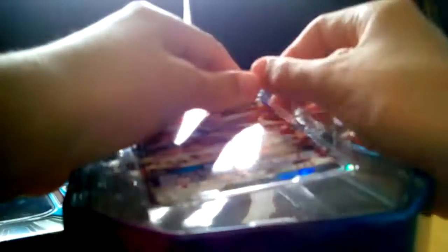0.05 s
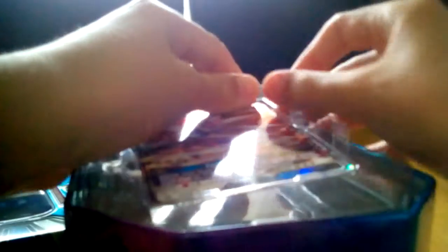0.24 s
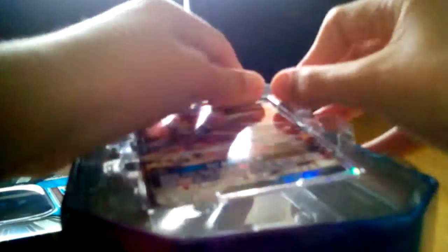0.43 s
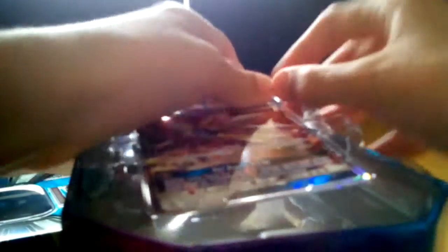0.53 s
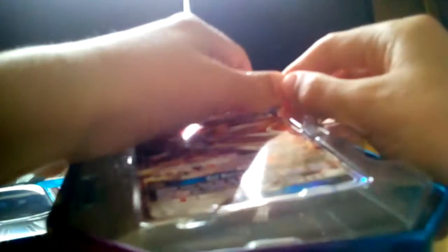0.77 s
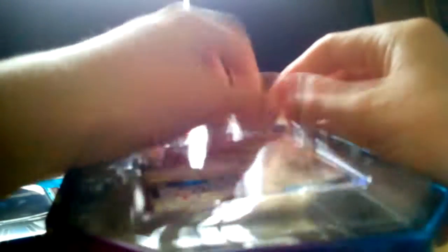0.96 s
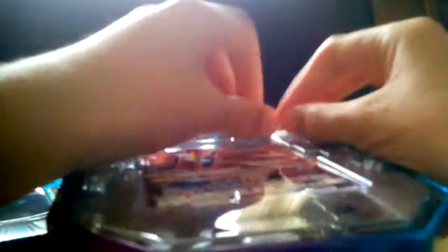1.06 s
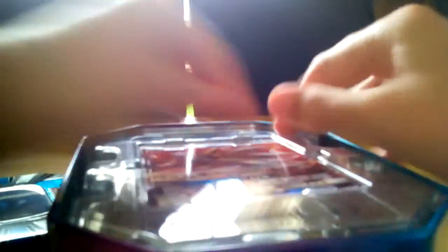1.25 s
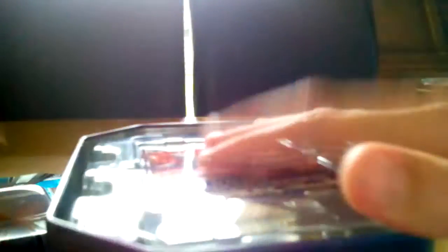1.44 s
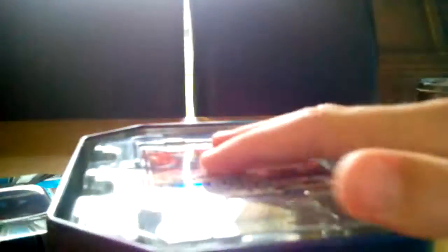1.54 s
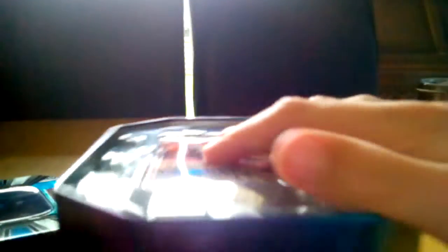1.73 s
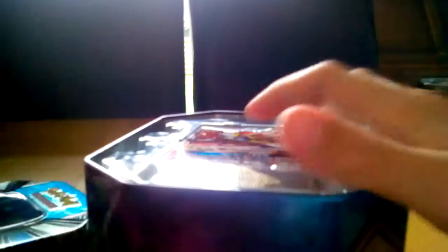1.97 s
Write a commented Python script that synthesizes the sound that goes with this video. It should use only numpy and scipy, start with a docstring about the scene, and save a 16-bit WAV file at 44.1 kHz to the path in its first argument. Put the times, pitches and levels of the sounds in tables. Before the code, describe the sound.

Three sharp, hollow snaps come from a tin's plastic cover, amid faint finger rubbing and tiny ticks. Light knocks on a table and a brief rattle of the metal lid follow, heard up close in a quiet room.

```python
"""In a small quiet room, close to the microphone, fingers pick at the clear plastic cover of a tin.
Skin catches and slips on the plastic, rubbing and hissing, and tiny creases tick under the nails.
Three times the stiff plastic flips with a sharp snap and a hollow pop. The tin bumps the table,
then a hand presses the lid, which buckles with a short metallic rattle."""
import sys
import numpy as np
from scipy import signal
from scipy.fft import rfft, irfft
from scipy.io import wavfile
from scipy.ndimage import uniform_filter1d

SR = 44100
rng = np.random.default_rng(int(sys.argv[2]) if len(sys.argv) > 2 else 0)


def store_wav(level_fs):
    """Save 16-bit WAV to argv[1]."""
    pcm = np.round(np.clip(np.atleast_2d(level_fs), -1, 1) * 32767)
    wavfile.write(sys.argv[1], SR, pcm.T.astype(np.int16))


N = 88200  # 2 seconds


def amp(db):
    """Turns decibels into a gain to multiply by."""
    return 10 ** (np.asarray(db) / 20)

def unit(x):
    """Scales a sound to an average (rms) level of 1."""
    return x / np.sqrt(np.mean(x ** 2) + 1e-20)

def value_at(curve, hz):
    """Looks up a value between a table's rows, on a log pitch scale."""
    pitches, values = np.transpose(curve)
    return np.interp(np.log(hz + 1), np.log(pitches + 1), values)

def add(mix, start_s, sound):
    """Mixes a sound in at a given time."""
    part = mix[max(round(start_s * SR), 0):][:len(sound)]
    part += sound[:len(part)]

def colour(x, curve, size=4096):
    """Makes each pitch louder or softer, following rows of pitch_hz, gain_db."""
    log_gain = np.log(amp(value_at(curve, abs(np.fft.fftfreq(size, 1 / SR)))))
    taps = np.fft.ifft(np.exp(np.conj(signal.hilbert(log_gain)))).real
    return signal.fftconvolve(x, taps[:size // 2])[:len(x)]

def burst(decay_s, size=8192):
    """A dying puff of noise, about equally strong at every pitch."""
    fade = np.exp(-np.arange(size) / SR / decay_s)
    puff = rng.standard_normal(size) * fade
    for _ in range(6):  # even out the pitches, then fade again
        puff = irfft(np.exp(1j * np.angle(rfft(puff)))) * fade ** 0.25
    return puff / np.linalg.norm(puff)

def ring(notes, size=22050):
    """Pure tones dying together; each falls by 60 dB in its ring_s."""
    t, out = np.arange(size) / SR, np.zeros(size)
    for pitch_hz, gain_db, ring_s in notes:
        decay = np.log(1000) / ring_s
        out += amp(gain_db) * 2 * decay / SR * np.exp(-decay * t) * np.cos(2 * np.pi * pitch_hz * t)
    return out

def fade_in(x, rise_s):
    """Brings a sound up from silence."""
    return x * np.minimum(np.arange(len(x)) / SR / rise_s, 1)


# Tone of the quiet room: pitch_hz, gain_db
BACKGROUND_TONE = [(25, -16.5), (100, 5.5), (200, 6.5), (400, -2.5), (1000, -2), (1350, -13.5), (1750, -4),
                   (2150, -15.5), (2700, -11.5), (3100, -21), (3650, -11.5), (4300, -29.5), (5700, -23),
                   (7500, -39), (10000, -45), (16000, -46.5)]
def background(level_db=-52.5):
    """A faint, steady, low noise."""
    return amp(level_db) * unit(colour(rng.standard_normal(N), BACKGROUND_TONE))

# How loud the rubbing is over time: time_s, level_db
RUB_LEVELS = [(0, -50), (.1, -50.5), (.17, -44), (.35, -44.5), (.45, -46.5), (.56, -40.5), (.69, -47),
              (.73, -47), (.84, -52), (.95, -36.5), (1.04, -44.5), (1.31, -46.5), (1.37, -42.5),
              (1.45, -65.5), (1.55, -61.5), (1.59, -37), (1.64, -57.5), (1.8, -44.5), (1.92, -49.5),
              (1.96, -37), (2, -44)]
# Dull tone of the rubbing: pitch_hz, gain_db
RUB_TONE = [(35, -36), (65, -8.5), (100, -1), (200, -4.5), (310, -0.5), (450, -2), (600, -6.5), (850, -6),
            (1250, -7.5), (1700, -20.5), (2700, -19), (4200, -32), (5900, -28.5), (8000, -64.5),
            (14000, -79.5)]
def rubbing(grains_per_s=5000, spread_db=2.5):
    """Fingertips catch and slip very fast; each slip is a tiny grain of sound."""
    grains = rng.standard_normal(N) * amp(spread_db * np.minimum(rng.exponential(1, N), 3))
    grains *= rng.random(N) < grains_per_s / SR
    level_db = np.interp(np.arange(N) / SR, *np.transpose(RUB_LEVELS))
    return unit(colour(grains, RUB_TONE)) * amp(level_db)

# Finger slides: start_s, rise_s, fade_s, level_db
FINGER_SLIDES = [(.04, 0.036, 0.01, -49), (.17, 0.019, 0.088, -49.5), (0.323, 0.018, 0.1, -54),
                 (0.4, 0.01, 0.026, -45), (0.531, 0.048, 0.064, -69.5), (1.932, 0.034, .05, -62)]
# Bright tone of a slide: pitch_hz, gain_db
SLIDE_TONE = [(500, -10.5), (2000, -1), (3500, 4), (6200, 2.5), (8000, -10.5), (11500, -15.5), (13000, -26),
              (16000, -40.5)]
def slides(grains_per_s=8300):
    """Skin slides over the plastic with short, grainy hisses."""
    out, t = np.zeros(N), np.arange(SR // 2) / SR
    for start_s, rise_s, fade_s, level_db in FINGER_SLIDES:
        fade = np.exp(-np.maximum(t - rise_s, 0) / fade_s)
        grains = rng.standard_normal(len(t)) * (rng.random(len(t)) < grains_per_s / SR)
        hiss = unit(colour(grains, SLIDE_TONE))
        add(out, start_s, amp(level_db) * fade_in(hiss, rise_s) * fade)
    return out

# Finger drags: start_s, rise_s, hold_s, fade_s, pitch_hz, width_hz, level_db
FINGER_DRAGS = [(0, 0.0026, .03, .02, 290, 100, -46.5), (1.335, 0.013, 0.017, 0.018, 277, 66, -40.5),
                (0.529, 0.024, .14, .015, 414, 180, -46), (1.758, 0.086, .2, .03, 1167, 320, -47.5)]
def drags():
    """A dragging finger shakes the cover or lid, making noise around one pitch."""
    out, t = np.zeros(N), np.arange(SR // 2) / SR
    for start_s, rise_s, hold_s, fade_s, pitch_hz, width_hz, level_db in FINGER_DRAGS:
        fade = np.exp(-np.maximum(t - rise_s - hold_s, 0) / fade_s)
        band = signal.butter(2, [pitch_hz - width_hz / 2, pitch_hz + width_hz / 2], "band", fs=SR)
        scrape = unit(signal.lfilter(*band, rng.standard_normal(len(t))))
        add(out, start_s, amp(level_db) * fade_in(scrape, rise_s) * fade)
    return out

# Ticks under the fingernails: start_s, gain_db
NAIL_TICKS = [(.139, -5), (.21, -4), (0.635, -2), (0.671, -3.5), (0.761, -7.5), (0.7844, -1.5), (.790, -7),
              (.947, 0.5), (1.033, -1.5), (1.166, -4), (1.212, -3), (1.319, -5), (1.332, -6), (1.365, -4)]
# Tone of a tick: pitch_hz, gain_db
TICK_TONE = [(70, -17), (350, 7.5), (1200, -0.5), (2000, -12), (4000, -19), (6000, -27.5), (7500, -43),
             (15000, -76)]
def ticks():
    """Tiny creases give way in the plastic, each with a puff of noise."""
    out = np.zeros(N)
    for start_s, gain_db in NAIL_TICKS:
        add(out, start_s, amp(gain_db) * burst(decay_s=0.0028))
    return colour(out, TICK_TONE)

# Notes of the plastic on the tin, rung by bumps and snaps: pitch_hz, gain_db, ring_s
COVER_NOTES = [(100, 9, .25), (145, 1, .18), (340, 2, .11), (425, 1, .1), (470, -1, .13), (595, 2, .13),
               (742, 0, .1), (820, -1, .09), (1115, 0, .11), (1345, 0, .08), (2230, -2, .1),
               (3090, -3, .08)]
# The tin meeting the table: start_s, gain_db, contact_s
TABLE_BUMPS = [(1.214, 3.5, 0.0014), (1.22, -2, 0.0021), (1.2346, -1, 0.0034), (1.295, -8.5, 0.00079),
               (1.356, -6, 0.00072), (1.367, -12.5, 0.00076), (1.561, -10, 0.0025), (1.573, -3, 0.0012),
               (1.587, -6, 0.00086), (1.5927, -2.5, 0.0012)]
# Tone of a bump: pitch_hz, gain_db
BUMP_TONE = [(40, -4), (110, 18), (200, 12), (320, 16.5), (600, 1.5), (1200, 12.5), (2500, -1.5),
             (6000, -14), (10000, -30)]
def bumps(ring_db=-10):
    """The tin knocks on the table and rings a little; a longer contact sounds duller."""
    out, knock = np.zeros(N), amp(ring_db) * ring(COVER_NOTES)
    knock[0] += 1  # the hit itself
    for start_s, gain_db, contact_s in TABLE_BUMPS:
        push = np.exp(-2 * np.arange(SR // 20) / SR / contact_s)
        add(out, start_s, amp(gain_db) * signal.fftconvolve(push / push.sum(), knock))
    return colour(out, BUMP_TONE)

# Quick hits as the lid buckles: start_s, gain_db
LID_HITS = [(1.669, -1), (1.6717, -4.5), (1.678, -6), (1.6824, -4.5), (1.6873, 0), (1.695, -8.5)]
# Tone of the crackle in lid hits and snaps: pitch_hz, gain_db
CRACKLE_TONE = [(150, -9.5), (600, -4.5), (1500, 0.5), (4000, -2)]
# Tone of a whole lid hit: pitch_hz, gain_db
HIT_TONE = [(50, -5.5), (160, 4.5), (500, 11), (1200, 7.5), (2200, 9), (3000, 1), (5500, -3), (8000, -22.5),
            (13000, -48), (16000, -49)]
# Notes of the metal lid: pitch_hz, gain_db, ring_s
LID_NOTES = [(155.7, 29.5, 0.067), (259.3, 27, 0.34), (361.6, 23, 0.23), (473.6, 27.5, 0.3),
             (555, 30.5, 0.079), (836, 30.5, 0.05), (903.6, 25.5, 0.21), (1608, 28, 0.13),
             (1883, 23.5, 0.12), (1947, 13, 0.38), (2113, 20, 0.11), (2465, 24.5, 0.38), (2480, 16.5, 0.34),
             (3500, -3, 0.51)]
def lid(crackle_db=4.5, ring_db=4.5):
    """The pressed lid rattles with a quick run of hits while the thin metal starts to ring."""
    hits = np.zeros(N)
    for start_s, gain_db in LID_HITS:
        hit = amp(crackle_db) * colour(burst(decay_s=0.009), CRACKLE_TONE)
        hit[0] += 1  # a clean click on top
        add(hits, start_s, amp(gain_db) * hit)
    out = colour(hits, HIT_TONE)
    add(out, LID_HITS[0][0], amp(ring_db) * fade_in(ring(LID_NOTES), rise_s=0.012))
    return out

# Pitches at which each snap's tone is set: pitch_hz
SNAP_PITCHES = [45, 100, 190, 330, 560, 800, 1230, 1700, 2400, 3700, 5000, 6200, 8000, 12000, 16000]
# Flips of the plastic, for snaps() and pops(): start_s, pop_hz, pop_db, knock_hz, knock_db,
# ping_db, crack_db, then one gain_db for each of the SNAP_PITCHES
PLASTIC_FLIPS = [(0.2228, 1167, 26.9, 318, 35.4, 28, 20.5, 8, 16.7, 20, 21.6, 26.8, 18.7, 23.8, 8.2, 20, 7, 17.5, 12.5, -4, -7.5, -14),
                 (0.8592, 1155, 26.7, 300, 26, 9.5, 14.5, -5, 26, 25.4, 28, 23, 30.8, 23, 14, 13.4, 7.4, 7.5, 12, -4, -2, -12),
                 (1.0569, 767, 29.8, 417, 25, -11, -24, 13, 24, 32.5, 25.3, 21.9, 16.5, 17.3, 7.8, 7.7, 1.8, 1.5, -0.5, -16, -18.5, -26)]
def snaps(click_hz=1550, click_db=-7, crackle_db=1.5):
    """The plastic flips with a dull click and a brief crackle, and rings on the tin."""
    out, t = np.zeros(N), np.arange(SR // 2) / SR
    click = np.exp(-2 * np.pi * click_hz * t)
    for start_s, *row in PLASTIC_FLIPS:
        snap = ring(COVER_NOTES) + amp(click_db) * click / click.sum()
        add(snap, 0, amp(crackle_db) * colour(burst(decay_s=0.0045), CRACKLE_TONE))
        tone = list(zip(SNAP_PITCHES, row[-len(SNAP_PITCHES):]))
        add(out, start_s, colour(snap, tone))
    return out

def swelling_note(pitch_hz, gain_db, ring_s=0.019, rise_s=0.0025):
    """One short note that swells and dies, filtered to the octave around its pitch."""
    note = fade_in(ring([(pitch_hz, gain_db, ring_s)]), rise_s)
    band = signal.butter(1, [pitch_hz / np.sqrt(2), pitch_hz * np.sqrt(2)], "band", fs=SR)
    return signal.lfilter(*band, note * np.sqrt(2))

# Tone of the sharp crack that starts each flip: pitch_hz, gain_db
CRACK_TONE = [(200, -17.5), (1200, -10.5), (2300, -2.5), (3800, -3.5), (5500, 1), (7000, -12.5),
              (8200, -27), (12000, -15), (16000, -32.5)]
def pops(ping_hz=5110, pop_delay_s=0.00065):
    """Each flip sends a crack and a ping, then a hollow pop and knock, straight at the microphone."""
    out = np.zeros(N)
    for start_s, pop_hz, pop_db, knock_hz, knock_db, ping_db, crack_db, *_ in PLASTIC_FLIPS:
        add(out, start_s, amp(crack_db) * colour(burst(decay_s=0.0016), CRACK_TONE))
        add(out, start_s, swelling_note(ping_hz, ping_db, ring_s=0.0044, rise_s=2 / ping_hz))
        add(out, start_s + pop_delay_s, swelling_note(pop_hz, pop_db))
        add(out, start_s + pop_delay_s, swelling_note(knock_hz, knock_db))
    return out

# How long the room rings: pitch_hz, ring_s
ROOM_RING = [(100, 0.16), (260, 0.2465), (700, 0.16), (1840, 0.2), (4850, 0.22), (12800, 0.14)]
# Echoes off the table and nearby surfaces: delay_s, gain
NEAR_ECHOES = [(.0031, 0.15), (.0065, 0.15), (.0098, 0.089), (0.014, 0.083), (0.0164, 0.12)]
def room(x, size=22050, tail_db=-3.5, rise_s=0.0054, smooth_hz=70):
    """Sound bounces around the room: a few quick echoes and a short, blurred tail."""
    hz, t, noise = signal.stft(rng.standard_normal(size), SR, nperseg=256)
    fade = np.exp(-np.log(1000) * t / value_at(ROOM_RING, hz)[:, None])
    tail = signal.istft(noise * fade, SR)[1][:size]
    spectrum = rfft(fade_in(tail, rise_s), 2 * size)
    power = uniform_filter1d(abs(spectrum) ** 2, int(smooth_hz * 2 * size / SR))
    even_tail = irfft(spectrum / np.sqrt(power))[:size]  # no pitch stands out
    response = fade_in(even_tail, rise_s)
    response *= amp(tail_db) / np.linalg.norm(response)
    response[0] += 1  # the sound that arrives directly
    for delay_s, gain in NEAR_ECHOES:
        add(response, delay_s, [gain])
    return signal.fftconvolve(x, response)[:N]

def scene(pop_room_share=0.16):
    """All the handling over the quiet background; only a little of each pop gets the room's echo."""
    handling = rubbing() + slides() + drags() + ticks() + bumps() + lid() + snaps()
    close_pops = pops()
    in_room = room(handling + pop_room_share * close_pops)
    return (background() + in_room + (1 - pop_room_share) * close_pops)[None]

# Tone of the small microphone: pitch_hz, gain_db
MIC_TONE = [(20, 12), (50, -3.5), (85, 1.5), (15000, 0)]
def record(dry, peak_limit=0.9, top_hz=15700):
    """The microphone reshapes the deep bass, clips any peak that is too loud and cuts the top treble."""
    clipped = np.clip(colour(dry[0], MIC_TONE), -peak_limit, peak_limit)
    treble_cut = signal.firwin(511, top_hz, window=("kaiser", 9), fs=SR)
    return signal.oaconvolve(clipped, treble_cut, "same")[None]


dry = scene()
out = record(dry)
store_wav(out)
```